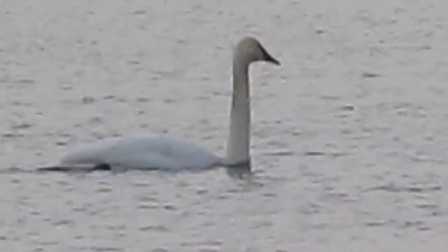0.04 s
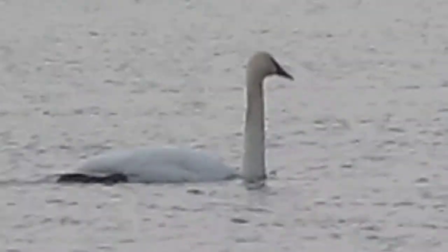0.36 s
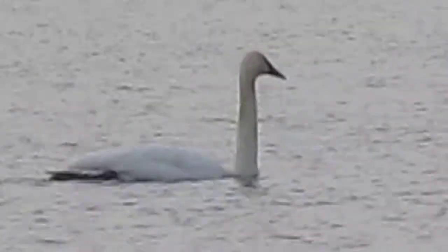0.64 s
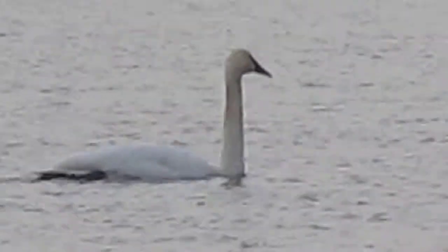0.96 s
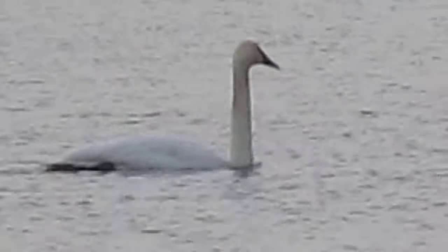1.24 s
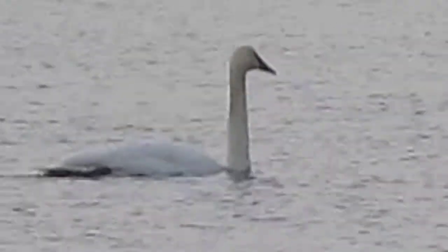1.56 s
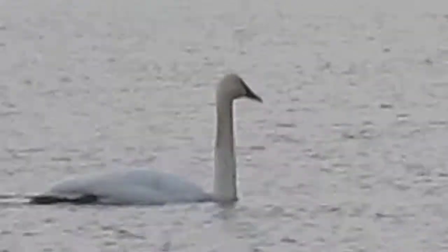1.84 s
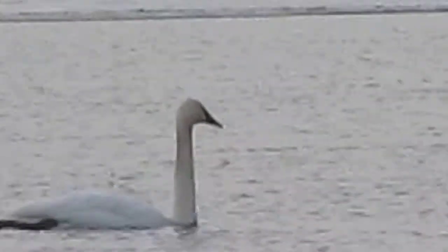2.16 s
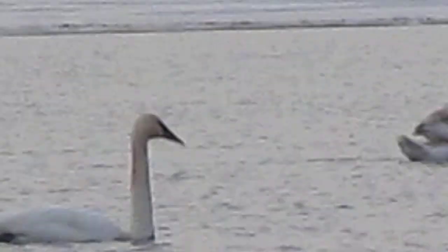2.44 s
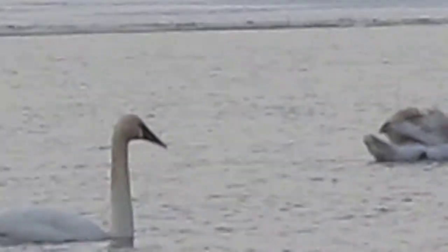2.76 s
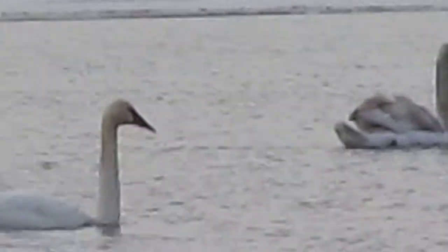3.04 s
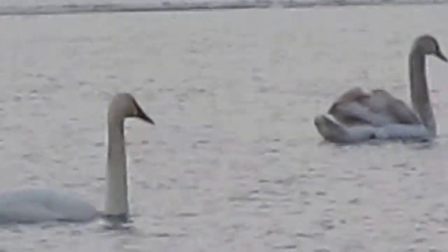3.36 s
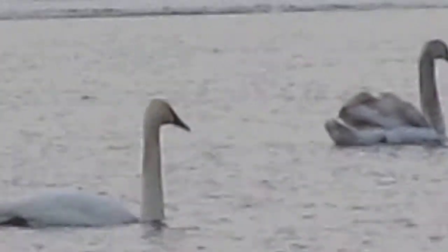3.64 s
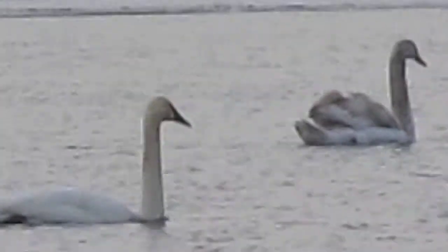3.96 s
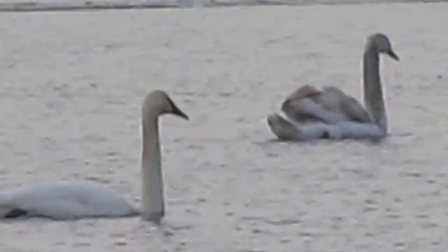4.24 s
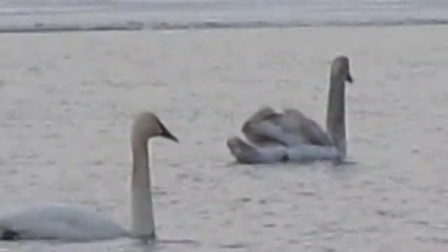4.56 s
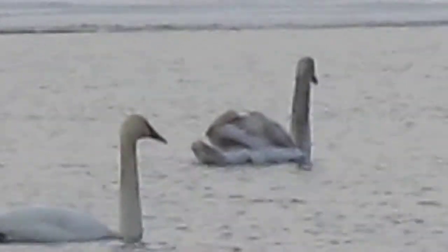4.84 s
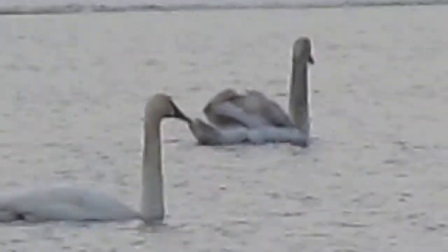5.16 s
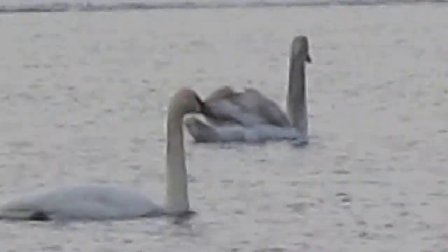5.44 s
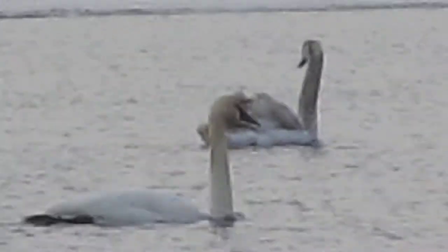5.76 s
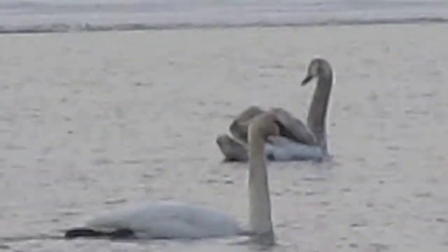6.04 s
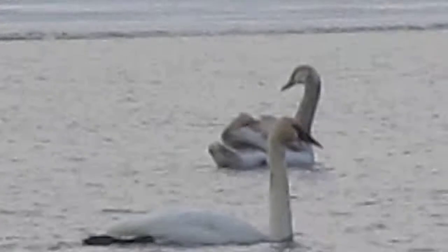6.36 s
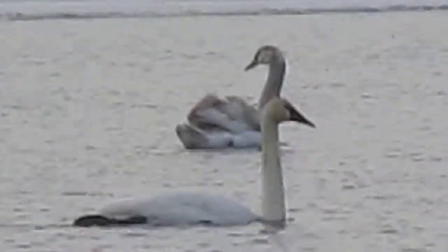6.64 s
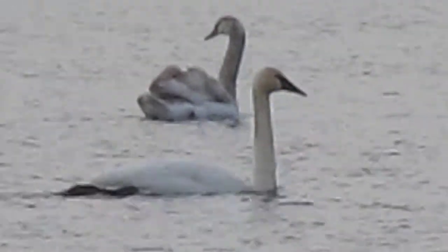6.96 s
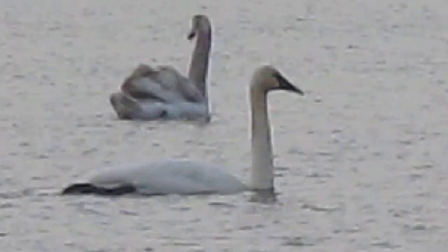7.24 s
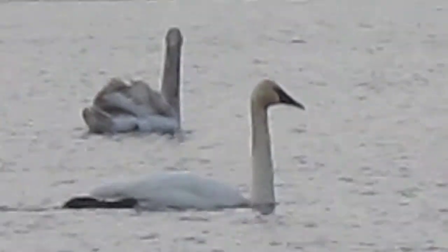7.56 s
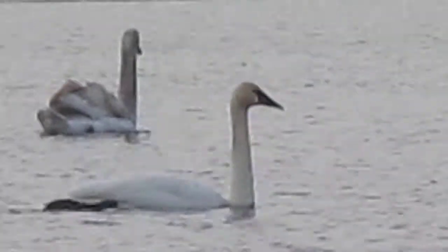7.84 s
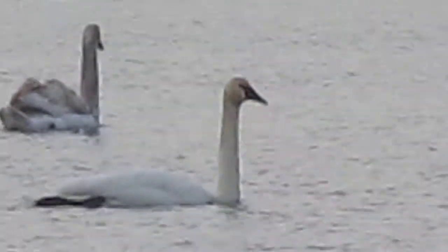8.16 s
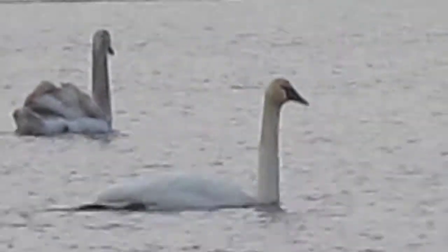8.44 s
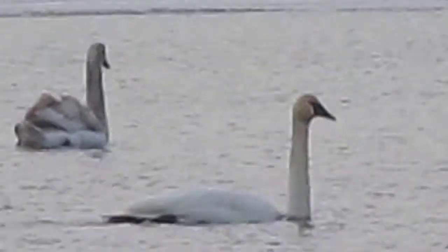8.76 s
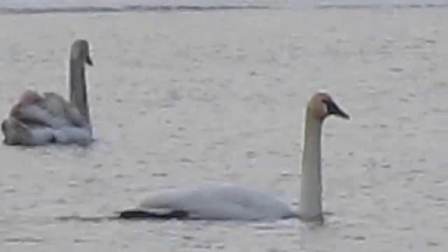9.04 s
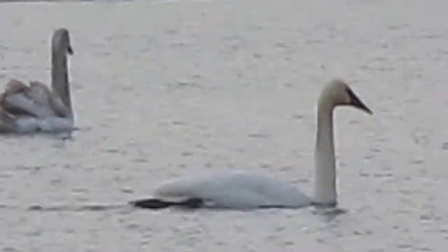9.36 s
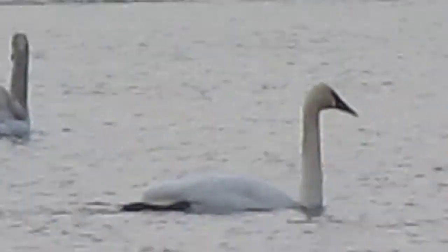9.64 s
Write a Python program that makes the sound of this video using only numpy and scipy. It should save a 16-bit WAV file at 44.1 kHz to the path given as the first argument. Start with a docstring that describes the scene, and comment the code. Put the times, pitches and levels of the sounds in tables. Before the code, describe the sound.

On an open lake, a low nasal groan from a bird is followed by a run of short swan honks ahead to the right. About halfway through, a nearer swan takes over on the left, growing louder and brassier. Other swans call faintly from far off. Distant traffic and an idling engine hum underneath, while wind rumbles and now and then thumps on the microphone.

```python
"""Swans on a windy lake

Two swans trade short nasal honks: one ahead to the right, then a nearer one on the left that
grows brassy. In each honk, membranes flap, lock into a tone and ring the bird's long windpipe.
Other birds answer from further off, over distant traffic and an idling engine.
Gusts buffet the microphone, and a limiter turns the sound down briefly when it overloads."""
import sys
import numpy as np
from scipy import signal
from scipy.fft import rfft, irfft, next_fast_len
from scipy.io import wavfile
from scipy.ndimage import uniform_filter1d, minimum_filter1d

SR = 44100
rng = np.random.default_rng(int(sys.argv[2]) if len(sys.argv) > 2 else 0)


def digitize_waveform(pressure):
    """Quantize a signal to 16-bit integers and store it at the path in sys.argv[1].

    Rows of a 2-D input are taken as channels; values are limited to [-1, 1].
    """
    field = np.atleast_2d(pressure).T
    bounded = np.clip(field, -1, 1)
    quanta = np.round(bounded * 32767).astype(np.int16)
    wavfile.write(sys.argv[1], SR, quanta)


N = 437031
TIME = np.arange(N) / SR

# The tone colour of each background noise. Each row: frequency in Hz, level in dB.
DRONE_SPECTRUM = [(25, -24), (60, 8.5), (110, 3.5), (160, 1), (220, -2), (320, -2.5), (450, -5),
                  (650, -5.5), (1000, -28.5), (2000, -61), (6000, -81.5)]
EXHAUST_SPECTRUM = [(220, -22), (295, 4), (325, 4.5), (380, -2), (470, -26.5), (2000, -90)]
TYRE_SPECTRUM = [(300, -13.5), (600, -3), (950, 0.5), (1300, -2.5), (1600, -5.5), (2000, -14),
                 (2600, -22.5), (3300, -28), (4500, -42), (8000, -62.5)]
AIR_SPECTRUM = [(1000, -10.5), (3000, -2), (4200, 2.5), (6000, 5.5), (8500, 2.5), (10300, -2), (12500, 1),
                (15500, -3)]
WIND_SPECTRUM = [(10, -33), (18, -2), (45, 0), (90, -2), (150, -13.5), (250, -23), (500, -48.5),
                 (1500, -71.5), (3000, -83.5), (8000, -100)]
HISS_SPECTRUM = [(1800, -28), (2700, 9), (3300, 12), (3800, -13), (5500, -6.5), (7000, -28), (10000, -48)]
# How loud the idling engine is. Each row: time in seconds, level in dB.
ENGINE_LEVELS = [(0, -42.5), (2.7, -35.5), (5.4, -33), (6.8, -39.5), (8.3, -36), (9.9, -44.5)]
# The tones in its hum. Each row: multiple of the firing rate, level in dB.
ENGINE_HARMONICS = [(2, -9), (3, -1), (4, -2), (5, -4.5), (6, -10)]
# Gusts. Each row: middle in seconds, length in seconds, level in dB, eddy speed (the breeze is 1).
WIND_GUSTS = [(0.393, 0.07, -17, 1.3), (0.633, 0.082, -17, 1.1), (1.045, 0.094, -18, 1.1),
              (1.192, 0.15, -19, 1.2), (2.0, .15, -33, 1), (5.848, 0.051, -14.5, 1.3),
              (6.212, 0.09, -21.5, 1.1), (6.261, 0.021, -6.5, 1.4), (7.687, 0.2, -24, .9),
              (9.697, 0.081, -12.5, 1.9), (9.79, 0.049, -13.5, 1.8), (9.877, 0.044, -13, 1.6)]
# Swans far away. Each row: middle in seconds, pitch in Hz, length in seconds, level in dB.
FAR_SWAN_CALLS = [(0.465, 690, 0.18, -44), (1.511, 706, 0.18, -44.5), (5.466, 702, 0.16, -39.5),
                  (6.913, 685, 0.32, -44.5)]
# Dry ticks. Each row: time in seconds, level in dB.
DRY_TICKS = [(.97, -46), (1.865, -38), (2.491, -23), (3.755, -38)]
# The right swan's honks. Each row: time of the highest pitch in seconds, pitch in Hz,
# base level in dB, brassiness in dB, opening rasp in dB.
RIGHT_SWAN_HONKS = [(1.383, 769, -31, -9.5, -29), (2.287, 752, -33.5, -18.5, -27.5),
                    (2.723, 739, -34.5, -15, -33), (3.113, 748, -31.5, -21.5, -32.5),
                    (3.544, 745, -30.5, -23.5, -26.5), (3.968, 746, -28.5, -16.5, -32.5),
                    (4.395, 746, -28.5, -16, -26), (4.796, 751, -33.5, -16, -27.5),
                    (5.253, 753, -33, -15, -28.5), (6.059, 761, -30, -20, -29.5)]
# The left swan's. Each row: the same, then hoarseness as a share of the pitch, boost above 10 kHz in dB.
LEFT_SWAN_HONKS = [(5.64, 728, -29.5, -27, -24.5, 0.027, 0), (5.838, 680, -37, -32, -28, .025, 0),
                   (6.461, 714, -25, -27, -30.5, 0.012, 1), (6.69, 731, -21, -31, -35, .006, 1),
                   (7.842, 713, -22.5, -28.5, -27.5, .006, 0), (8.031, 738, -21, -32, -27, .012, 1),
                   (8.251, 741, -20.5, -28.5, -27, 0.01, -3), (8.752, 745, -17.5, -25.5, -23.5, 0.0065, -5),
                   (8.985, 747, -18, -19.5, -27, .015, -1), (9.255, 754, -16.5, -8.5, -23, 0.0035, -7),
                   (9.521, 766.4, -16.5, -13.5, -20.5, .006, 6), (9.81, 765, -19, -16.5, -27.5, 0.0051, 2)]
# How each bird's windpipe shapes its voice. Each row: frequency in Hz, gain in dB.
GROAN_WINDPIPE = [(190, -17), (570, -6), (760, -7), (950, 1.5), (1140, 4), (1330, 0), (1550, -27),
                  (2800, -39), (3700, -32), (5100, -35), (6000, -49), (6700, -45), (9000, -63)]
RIGHT_WINDPIPE = [(400, -7), (750, -9.5), (1150, -1), (1500, 0), (2250, -10.5), (3000, -17.5), (3750, -5),
                  (4500, -8.5), (5300, -11), (6100, -12.5), (6900, -28.5), (8000, -43), (15000, -48)]
LEFT_WINDPIPE = [(400, -2.5), (750, -8.5), (1150, -3.5), (1500, 0.5), (2250, -7.5), (3000, -10.5),
                 (3750, -6), (4500, -7.5), (5300, -6.5), (6100, -18), (6800, -17.5), (7600, -20),
                 (9000, -21.5), (10500, -34), (13000, -27), (15500, -27)]
# How each swan is shaded at the far side of the microphone. Each row: frequency in Hz, gain in dB.
RIGHT_SWAN_SHADE = [(750, -0.5), (1500, -5.5), (2250, -9), (3750, -5), (4700, -1), (9000, 1.5)]
LEFT_SWAN_SHADE = [(750, -1.5), (2250, -1.5), (3750, -6.5), (4500, -19.5), (5300, -15.5), (8000, -3),
                   (15000, -24.5)]
# The tone colour of the noises in a honk. Each row: frequency in Hz, level in dB.
RASP_SPECTRUM = [(300, -32), (700, -3), (950, -11), (1130, -11.5), (1280, -3), (1450, -6.5), (1900, -8.5),
                 (3000, -15.5), (4200, -3.5), (5500, -18.5), (7500, -30), (15000, -41)]
CROAK_SPECTRUM = [(500, -11), (1000, .5), (1300, 2), (2000, -15), (5000, -24)]
RUSH_SPECTRUM = [(2000, -20), (4500, 6), (5700, -.5), (7500, -14), (10500, -15.5), (13500, -8.5)]
SLAP_SPECTRUM = [(2000, -8), (4300, -2), (5500, -6.5), (7000, -17), (15000, -31)]
# Harder blowing lifts high tones most. Each row: frequency in Hz, share of the brassiness it gets.
BRASS_SHARE = [(1500, 0), (3700, 1), (7000, 1), (12000, 1.25)]
# Squeaks. Each row: middle in seconds, pitch in Hz, length in seconds, base level in dB.
HIGH_SQUEAKS = [(1.517, 3600, .018, -57), (9.691, 5260, 0.014, -46), (9.726, 5300, 0.019, -43),
                (9.749, 4870, 0.014, -45), (9.776, 5330, 0.012, -41)]
# Knocks of wind. Each row: time in seconds, pitch in Hz, length in seconds, base level in dB,
# gain on the left, gain on the right.
WIND_THUMPS = [(5.323, 111, 0.011, -2.5, 0.86, -0.31), (6.26, 114, .006, 0, -0.48, 0.85),
               (6.265, 330, 0.0024, -2, 1, -0.21), (9.385, 170, .006, -12.5, 1, -0.066),
               (9.694, 171, 0.00584, -0.5, 0.79, 0.53), (9.877, 288, 0.0021, 3, 0.92, -0.25)]
# Faint hisses. Each row: start in seconds, length in seconds, level in dB.
FAINT_HISSES = [(5.38, .36, -61), (7.943, 2, -56)]
# Soft notes. Each row: middle in seconds, pitch in Hz, length in seconds,
# level at the windpipe's resonance in dB, that resonance in Hz.
HELD_NOTES = [(8.14, 686, .17, -69, 5500), (9.365, 693, 0.17, -62.5, 4140)]

LOCK_LEAD_S = .018  # a honk locks into its tone this long before its highest pitch


def amp(db):
    """Turn decibels into a gain."""
    return 10 ** (np.asarray(db) / 20)


def unit(x):
    """Scale a sound to an average (rms) level of 1."""
    return x / np.sqrt(np.mean(x ** 2) + 1e-18)


def value_at(points, hz):
    """Read between a table's rows, on a scale of octaves."""
    frequencies, values = np.transpose(points)
    return np.interp(np.log(np.maximum(hz, 1)), np.log(frequencies), values)


def colour(x, points, lag_ms=0):
    """Filter a sound by (Hz, dB) points, and delay it if asked."""
    size = next_fast_len(x.shape[-1])
    hz = np.arange(size // 2 + 1) * SR / size
    delay = np.exp(-2j * np.pi * hz * lag_ms / 1000)
    return irfft(rfft(x, size) * amp(value_at(points, hz)) * delay, size)[..., :x.shape[-1]]


def wobble(rate, size):
    """A smooth random wobble of about 1 either way, with `rate` new values a second."""
    step = max(int(SR / rate), 1)
    stairs = np.repeat(rng.standard_normal(size // step + 1), step)
    return 1.318 * uniform_filter1d(uniform_filter1d(stairs, step), step)[:size]


def stereo_noise(points, likeness):
    """Coloured noise; a likeness of 1 makes left and right the same."""
    mid, side = rng.standard_normal((2, N))
    mid, side = np.sqrt(1 + likeness) * mid, np.sqrt(1 - likeness) * side
    return unit(colour(np.array([mid + side, mid - side]), points))


def add(out, x, at):
    """Mix x into out, with its middle at the given time."""
    start = int(at * SR) - x.shape[-1] // 2
    first, last = max(start, 0), min(start + x.shape[-1], N)
    out[..., first:last] += x[..., first - start:last - start]


def around(half):
    """Sample times from -half to +half seconds."""
    return np.arange(-int(half * SR), int(half * SR)) / SR


def phase_of(hz):
    """The running angle of a wave whose pitch changes."""
    return 2 * np.pi * np.cumsum(hz) / SR


def traffic(beat_top_s=1.42, beat_period_s=2.92):
    """Across the water, tyres roar while engines and exhausts swell and ebb, under a thin hiss of air."""
    beat = np.cos(2 * np.pi * (TIME - beat_top_s) / beat_period_s)
    drone = stereo_noise(DRONE_SPECTRUM, likeness=.98) * amp(-32 + 1.5 * beat + .89 * wobble(9, N))
    exhaust = stereo_noise(EXHAUST_SPECTRUM, likeness=.74) * amp(-47.5 + 8.5 * beat)
    tyres = stereo_noise(TYRE_SPECTRUM, likeness=.74) * amp(-34 + 1.7 * wobble(3.9, N))
    left, right = drone + exhaust + tyres
    # the road lies to the right, so its sound reaches the left later
    left = colour(left, [(150, -1.5), (500, -3), (1500, -5.5)], lag_ms=.11)
    air = stereo_noise(AIR_SPECTRUM, likeness=.11) * amp(-65)
    return np.array([left, right]) + air


def idling_engine(firing_hz=29.1):
    """A distant engine hums at multiples of its firing rate, each wavering in level."""
    level_db = np.interp(TIME, *np.transpose(ENGINE_LEVELS))
    phase = phase_of(firing_hz * (1 + .03 * wobble(5, N)))
    hum = sum(amp(db + 3.2 * wobble(9, N)) * np.sin(k * phase + 1.52 * wobble(14, N))
              for k, db in ENGINE_HARMONICS)
    return unit(hum) * amp(level_db)


def wind(settle_s=.9):
    """Eddies (swirls of air) rumble on the microphone; faster ones sound higher."""
    breeze_db = -31 + 5 * np.exp(-TIME / settle_s)  # brisker at first
    out = stereo_noise(WIND_SPECTRUM, likeness=-.17) * amp(breeze_db + 1.4 * wobble(14, N))
    for at, length, db, speed in WIND_GUSTS:
        t = around(length + .03)
        spectrum = [(hz * speed, level) for hz, level in WIND_SPECTRUM]
        eddies = colour(rng.standard_normal((2, len(t))), spectrum)
        eddies = colour(eddies, [(20, -13), (90, -5.5)])
        eddies = eddies - .38 * eddies[::-1]  # left and right partly oppose each other
        swell = np.exp(-(1.32 * t / length) ** 2)
        burst = eddies * swell
        add(out, burst * amp(db) * np.sqrt(np.mean(swell ** 2) / np.mean(burst ** 2)), at)
    return out


def far_swans():
    """Longer, nearly level notes; distance leaves only the three lowest harmonics."""
    out = np.zeros(N)
    for at, hz, length, db in FAR_SWAN_CALLS:
        t = around(length)
        phase = phase_of(hz * (1 - 2.385 * t ** 2 + .0077 * wobble(150, len(t))))
        tone = amp(-11.5) * np.sin(phase) + np.sin(2 * phase) + amp(-11) * np.sin(3 * phase)
        add(out, unit(tone) * amp(db) * np.exp(-(2 * t / length) ** 4), at)
    return out


def shore_echo(calls, decay_s=.5):
    """The banks scatter back a faint, dull echo."""
    t = np.arange(int(.7 * SR)) / SR
    tail = rng.standard_normal((2, len(t))) * amp(-60 * t / decay_s) * (t > .02)
    tail = colour(tail, [(1500, -2.5), (4000, -10.5), (9000, -20)])
    tail = tail / np.sqrt(np.sum(tail[0] ** 2))
    return amp(-29) * signal.fftconvolve(calls, tail, axes=1)[:, :N]


def groan(start_s=.545, top_s=.655, top_hz=187.8, length_s=.33, attack_s=.035, release_s=.08):
    """A bird's low buzz, made nasal by its windpipe; the pitch rises and falls slightly."""
    since = np.arange(int(length_s * SR)) / SR
    t = start_s + since
    hz = top_hz - 434 * (t - top_s) ** 2
    swell = np.minimum(since / attack_s, 1) * np.minimum(since[::-1] / release_s, 1)
    phase = phase_of(hz * (1 + .008 * wobble(300, len(t))))
    buzz = 0
    for k in range(1, 42):
        db = value_at(GROAN_WINDPIPE, k * hz) + 2 * wobble(41.6, len(t))
        buzz += amp(db) * np.sin(k * phase + rng.uniform(0, 2.9))
    treble = colour(buzz, [(2000, -40), (3200, 4)])
    buzz += treble * (amp(-16 * (t - top_s)) - 1)  # the treble fades faster than the rest
    right = np.zeros(N)
    add(right, unit(buzz) * swell * amp(-32.5 - 7 * since), t.mean())
    left = colour(right, [(1000, 2.4), (3000, 2), (5000, 13)], lag_ms=.16)
    return np.array([left, right])


def ticks():
    """Tiny bursts of noise, heard as dry ticks."""
    out = np.zeros(N)
    for at, db in DRY_TICKS:
        t = around(.0033)
        add(out, amp(db) * rng.standard_normal(len(t)) * np.exp(-abs(t) / .00029), at)
    return colour(out, [(500, 0), (3000, -1), (7000, -14), (15000, -16)])


def honk_envelopes(t):
    """How the tone and the flapping rise and fall, in dB; t is 0 at the highest pitch."""
    since_lock = t + LOCK_LEAD_S
    release_db = (np.maximum(t - .013, 0) / .0076) ** 2
    # the tone swells, droops (both in dB a second) and dies away
    loud_db = np.minimum(851 * since_lock, -27 * since_lock) - release_db
    # the flapping builds until just before the lock, then drops to a faint flutter
    since_peak = t + .021
    flap_db = np.minimum(340 * since_peak, -1500 * since_peak)
    return loud_db, np.maximum(flap_db, -26.5 + .25 * loud_db)


def croak(t, flap_hz=301.4, ring_hz=1174, ring_s=.0015):
    """Uneven flaps of the membranes, each ringing the windpipe for a few cycles."""
    gap, size, detune = rng.standard_normal((80, 3)).T
    flap_times = t[0] + np.cumsum(np.exp(.3 * gap)) / flap_hz
    since = np.maximum(t - flap_times[:, None], 0)
    rings = np.sin(2 * np.pi * ring_hz * (1 + .069 * detune[:, None]) * since) * np.exp(-since / ring_s)
    return unit(colour(amp(3 * size) @ rings, CROAK_SPECTRUM))


def honk(windpipe, arch, dulling, pitch_hz, level_db, brass_db, rasp_db, hoarse=.0054, edge_db=0):
    """The membranes flap unevenly, lock into a clear tone that arches in pitch, then go slack."""
    t = around(.075)
    size = len(t)
    loud_db, flap_db = honk_envelopes(t)
    # flapping shakes the pitch; a hard-blown note sags less
    jitter = (hoarse + .025 * amp(flap_db)) * wobble(1100, size) + .003 * wobble(70, size)
    sag = arch * amp(-.2 * (brass_db + 20)) * t ** 2
    hz = pitch_hz * (1 - np.minimum(sag, .3) + jitter)
    phase = phase_of(hz)
    tone = 0
    for k in range(1, 22):
        waver_db = 2.2 * wobble(55, size) + 1.5 * rng.standard_normal()
        bright_db = value_at(BRASS_SHARE, k * pitch_hz) * (brass_db + dulling * loud_db + waver_db)
        db = level_db + value_at(windpipe, k * hz) + loud_db + bright_db
        if k == 1:  # the lowest tone follows the honk's level only half as much
            db -= .51 * (level_db + 21)
        tone += np.sqrt(2) * amp(db) * np.sin(k * phase + rng.uniform(0, 2 * np.pi))
    flaps = rng.standard_normal(size) * amp(3.5 * wobble(350, size))
    rasp = unit(colour(flaps, [(f, db + brass_db * value_at(BRASS_SHARE, f)) for f, db in RASP_SPECTRUM]))
    onset = (.55 * rasp * amp(.2 * loud_db) + croak(t)) * amp(rasp_db + flap_db)
    # in a brassy note, air rushes through once a cycle
    rush = unit(colour(rng.standard_normal(size) * (1 + np.cos(phase)), RUSH_SPECTRUM))
    rush *= amp(level_db + 1.3 * brass_db + 2 * loud_db - 13)
    # the membranes slap once as they lock
    slap = unit(colour(rng.standard_normal(size), SLAP_SPECTRUM))
    slap *= amp(level_db + brass_db - 13) * np.exp(-((t + LOCK_LEAD_S) / .007) ** 2)
    return colour(tone + onset + slap + rush, [(10000, 0), (11500, edge_db)])


def swan(honks, windpipe, shade, lag_ms, arch, dulling):
    """One bird's honks reach the near side of the microphone, then the shaded far side."""
    near = np.zeros(N)
    for at, *call in honks:
        add(near, honk(windpipe, arch, dulling, *call), at)
    return np.array([near, colour(near, shade, lag_ms)])


def squeaks():
    """Thin, rough squeaks on the left, each a quick downward flick."""
    out = np.zeros(N)
    for at, hz, length, db in HIGH_SQUEAKS:
        t = around(2 * length)
        phase = phase_of(hz * np.exp(-24 * t + .098 * wobble(1500, len(t))))
        add(out, amp(db) * np.sin(phase) * np.exp(-(2 * t / length) ** 2), at)
    return out * amp([[3], [-5]])


def wind_thumps():
    """Single eddies hit the microphone and push it for about one cycle."""
    out = np.zeros((2, N))
    for at, hz, length, db, *sides in WIND_THUMPS:
        t = around(3 * length)
        phase = 2 * np.pi * hz * t + .2 * wobble(900, len(t))
        push = amp(db) * np.cos(phase) * np.exp(-(2.03 * t / length) ** 2)
        add(out, np.outer(sides, push), at)
    return out


def hisses(edge_s=.06, fade_db_per_s=4.5):
    """A faint, narrow hiss that sets in, slowly fades and stops."""
    gain = 0
    for start, length, db in FAINT_HISSES:
        since = np.clip(TIME - start, 0, length)
        ramp = np.minimum(np.minimum(since, length - since) / edge_s, 1)
        gain += ramp * amp(db - fade_db_per_s * since)
    return gain * stereo_noise(HISS_SPECTRUM, likeness=.33)


def soft_notes(falloff_db_per_hz=.7):
    """Very quiet held notes; overtones weaken the further they lie from one windpipe resonance."""
    out = np.zeros(N)
    for at, hz, length, db, resonance_hz in HELD_NOTES:
        t = around(length)
        phase = phase_of(hz * (1 + .002 * wobble(80, len(t))))
        tone = 0
        for k in range(2, 10):
            overtone_db = db - falloff_db_per_hz * abs(k * hz - resonance_hz)
            tone += amp(overtone_db + 2 * wobble(27, len(t))) * np.sin(k * phase)
        add(out, np.sqrt(2) * tone * np.exp(-(2 * t / length) ** 4), at)
    return out


def scene():
    """Birds, road and wind together, in stereo."""
    right_swan = swan(RIGHT_SWAN_HONKS, RIGHT_WINDPIPE, RIGHT_SWAN_SHADE,
                      lag_ms=.032, arch=78, dulling=.33)[::-1]  # flipped: its near side is the right
    left_swan = swan(LEFT_SWAN_HONKS, LEFT_WINDPIPE, LEFT_SWAN_SHADE, lag_ms=.19, arch=75, dulling=.96)
    birds = right_swan + left_swan + groan() + far_swans()
    faint = shore_echo(birds) + squeaks() + ticks() + hisses() + soft_notes()
    return birds + faint + traffic() + idling_engine() + wind() + wind_thumps()


def record(dry, hold_s=.16, top_hz=15800):
    """A limiter holds the volume down after an overload; then the highest treble is cut."""
    hold = int(hold_s * SR)
    needed = np.minimum(1, 1 / (abs(dry).max(axis=0) + 1e-9))
    gain = minimum_filter1d(needed, hold, origin=(hold - 1) // 2)
    limited = np.clip(dry * uniform_filter1d(gain, size=160), -1, 1)
    return signal.sosfilt(signal.ellip(10, .2, 70, top_hz, fs=SR, output="sos"), limited)


dry = scene()
out = record(dry)
digitize_waveform(out)
```